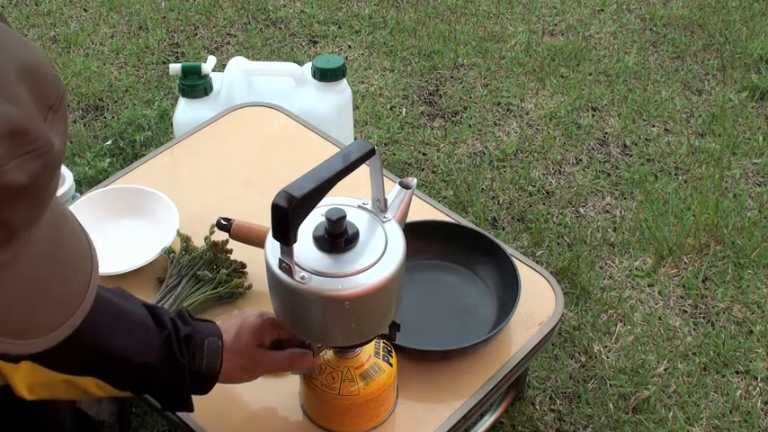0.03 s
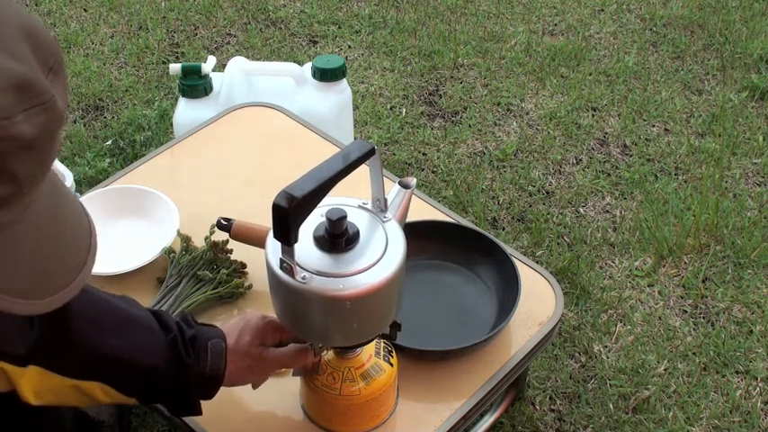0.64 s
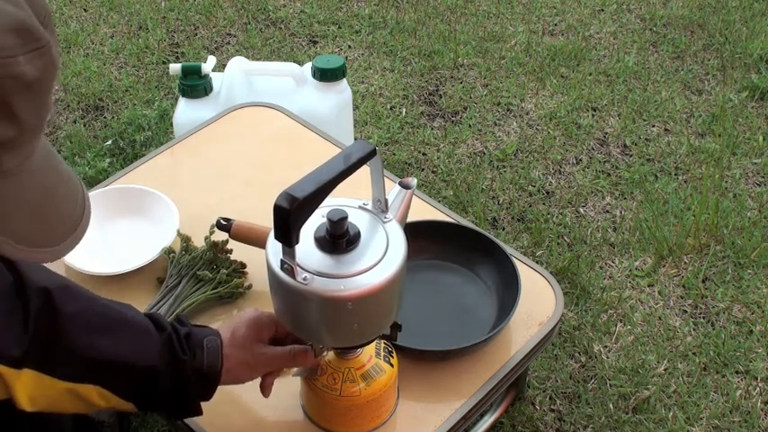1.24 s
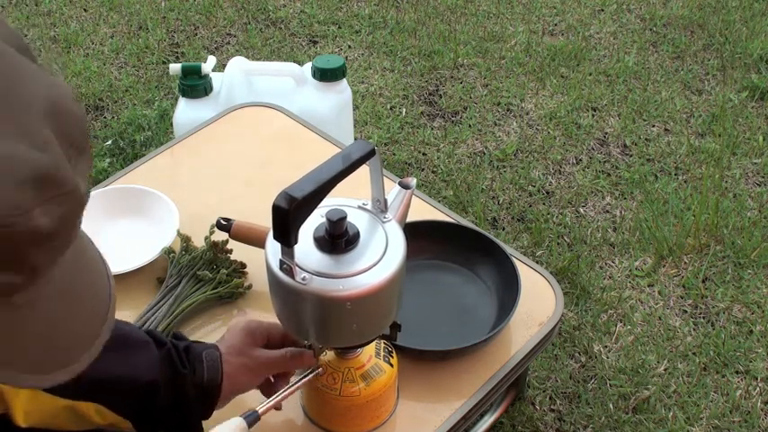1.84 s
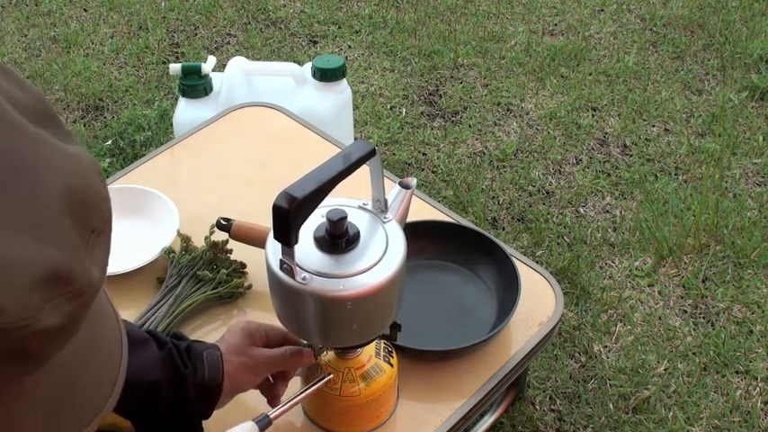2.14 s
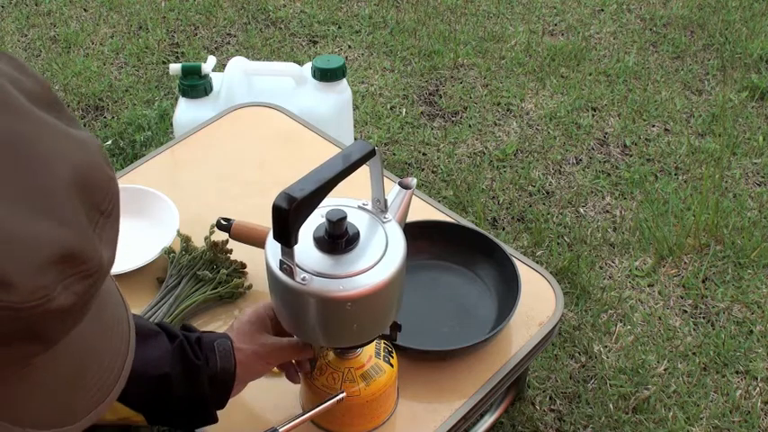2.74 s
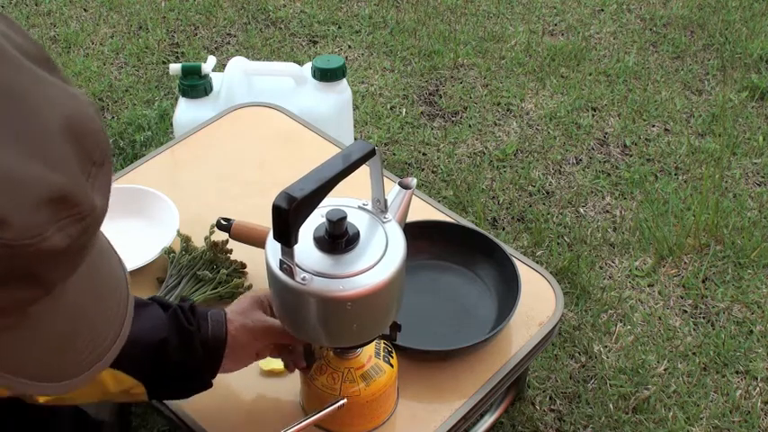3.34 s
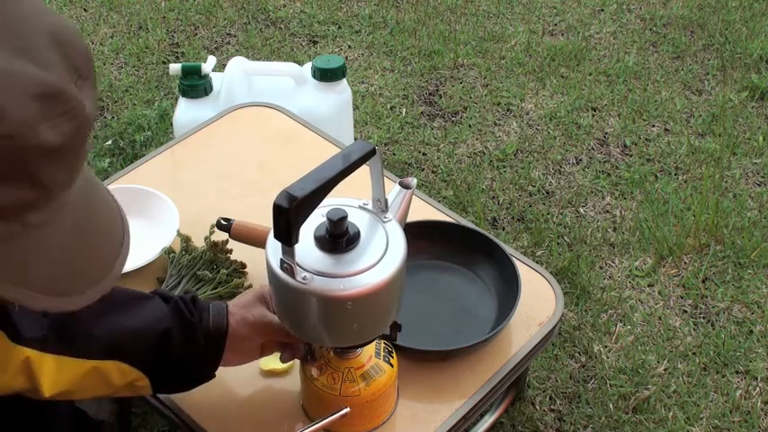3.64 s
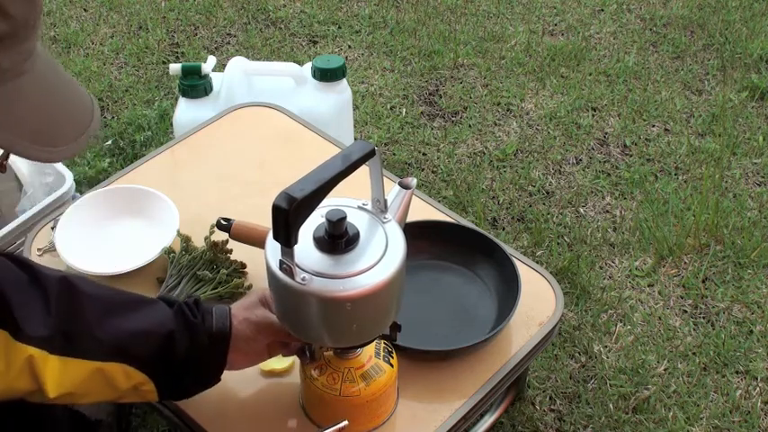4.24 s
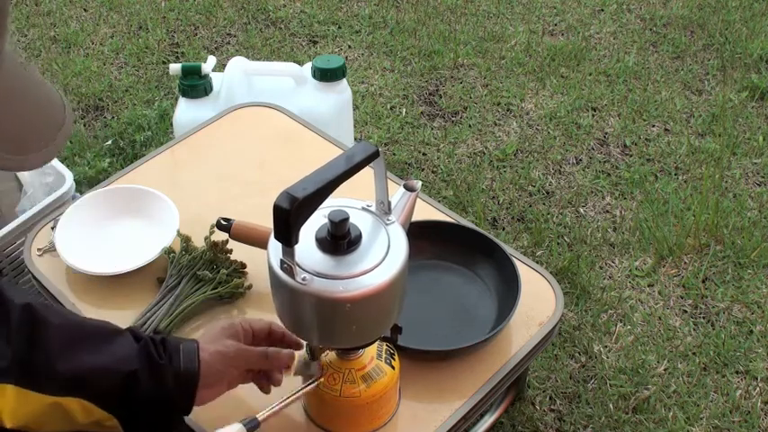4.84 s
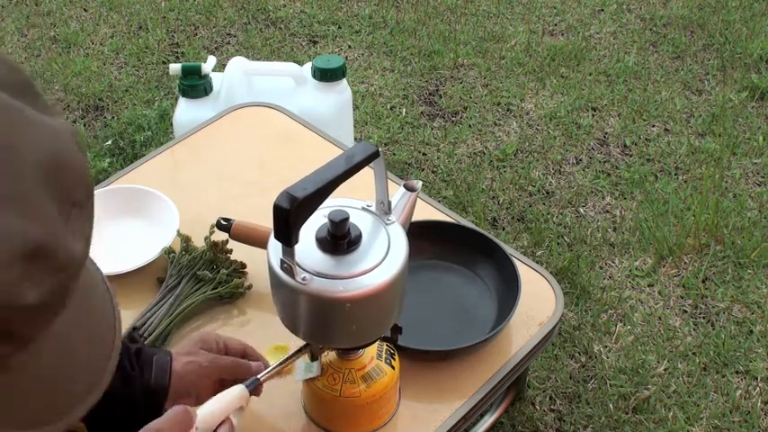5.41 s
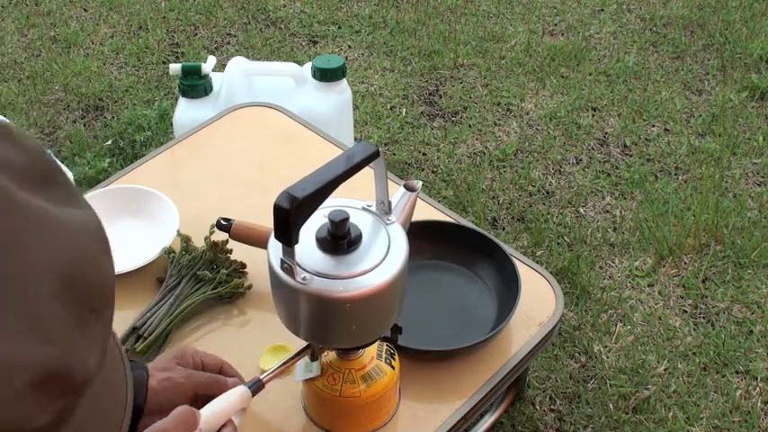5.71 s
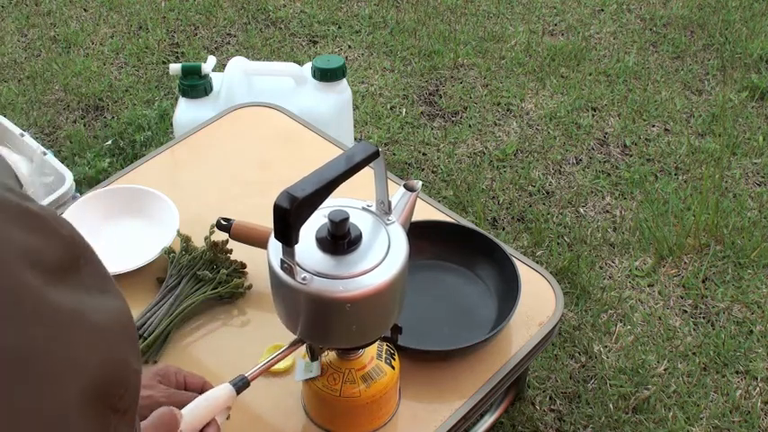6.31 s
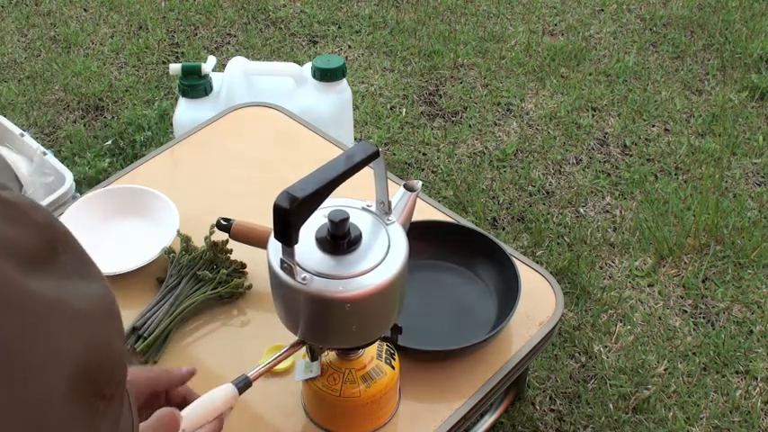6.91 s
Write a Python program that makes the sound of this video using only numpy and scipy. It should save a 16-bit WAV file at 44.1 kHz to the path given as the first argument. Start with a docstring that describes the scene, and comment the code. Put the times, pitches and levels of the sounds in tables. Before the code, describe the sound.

Gas hisses from a camp stove outdoors, with small metallic knocks from the kettle on top and one sharp lighter click.

```python
"""A camping gas stove with a kettle on it stands on a folding table on a lawn, in faint still air. From the
start a hand works the valve: the stove rocks and knocks, its foot scrapes the table, the thread ticks. Gas
starts at 0.7 s and opens fully at 1.3 s; the turbulent jet hisses through the ringing burner tube. At 4.4 s a
wand lighter snaps once, and the knocking soon thins out. From 5.3 s the wand taps about on the burner, whose
steady rush goes on."""
import sys
import numpy as np
from scipy import signal
from scipy.fft import rfft, irfft
from scipy.io import wavfile
from scipy.ndimage import uniform_filter1d

SR = 44100
rng = np.random.default_rng(int(sys.argv[2]) if len(sys.argv) > 2 else 0)


def generate_wav(signal):
    """Clip the signal to [-1, 1] and save it as 16-bit WAV at the path in sys.argv[1]."""
    frames = np.transpose(np.atleast_2d(signal))
    scaled = np.clip(frames, -1, 1) * 32767
    pcm = np.round(scaled).astype(np.int16)
    wavfile.write(sys.argv[1], SR, pcm)


N = 315756

# left-right coherence, nearly centred, fully mono above 12.5 kHz: f/Hz, coherence/0-1
COHERENCE = [(30, .75), (70, 0.7), (150, 1), (300, 0.98), (700, 0.8), (1400, 0.81), (2800, 0.96),
             (5200, 0.97), (7500, 1), (9500, 0.85), (11500, 0.88), (12500, 1)]


def gain_of(db):
    """Decibels to amplitude."""
    return 10 ** (np.asarray(db) / 20)


def unit_rms(x):
    """Scales to rms 1."""
    return x / np.sqrt(np.mean(x ** 2) + 1e-20)


def unit_hit(x):
    """Scales a hit to rms 1 over its first 30 ms."""
    return x / np.sqrt(np.mean(x[..., :round(.03 * SR)] ** 2))


def at_hz(table, hz):
    """Interpolates a spectrum table over log frequency."""
    table_hz, value = np.transpose(table)
    return np.interp(np.log(hz + 1), np.log(table_hz + 1), value)


def add(mix, start_s, sound):
    """Mixes a sound in at start_s."""
    part = mix[:, round(start_s * SR):][:, :sound.shape[1]]
    part += sound[:, :part.shape[1]]


def stereo(mid, side, hz, coherence=COHERENCE):
    """Left and right spectra from a shared and an unshared part."""
    same = np.clip(at_hz(coherence, hz), 0, 1)
    mid, side = mid * np.sqrt((1 + same) / 2), side * np.sqrt((1 - same) / 2)
    return np.array([mid + side, mid - side])


def noise(colour, size, coherence=COHERENCE):
    """Stereo noise of rms 1 with the given spectrum."""
    hz = np.fft.rfftfreq(size, 1 / SR)
    white = stereo(*rfft(rng.standard_normal((2, size))), hz, coherence)
    return unit_rms(irfft(white * gain_of(at_hz(colour, hz)), size))


def wander(t, slow_hz, fast_hz):
    """Slow random motion of rms 1."""
    rates_hz = np.geomspace(slow_hz, fast_hz, 30)
    return unit_rms(sum(np.sin(2 * np.pi * (hz * t + rng.random())) / hz ** 0.06 for hz in rates_hz))


def decay(t, rise_s, t60_s, tail_db, tail_t60_s):
    """Envelope: quick rise, main decay, weaker and longer tail."""
    tail = gain_of(tail_db - 60 * t / tail_t60_s)
    return (1 - np.exp(-t / rise_s)) * np.hypot(gain_of(-60 * t / t60_s), tail)


def modes(t, table, rise_s, low_hz=0, high_hz=SR):
    """An object's damped modes in one band; strength and phase vary per strike."""
    hz, db, t60_s = np.transpose(table)[:, :, None]
    spread_db, phase = 2 * rng.standard_normal(hz.shape), rng.random(hz.shape)
    rings = gain_of(db + spread_db - 60 * t / t60_s) * np.sin(2 * np.pi * (hz * t + phase))
    in_band = (hz > low_hz) * (hz < high_hz)
    return unit_hit((rings * in_band).sum(0) * (1 - np.exp(-t / rise_s)))


def low_cut(x, cutoff_hz=150):
    """High-pass at 150 Hz keeps deep rumble out of the knocks, slips and rubs."""
    return signal.sosfilt(signal.butter(2, cutoff_hz, "highpass", fs=SR, output="sos"), x)


def air(level_db=-57.5):
    """Still air over the lawn; distant sound reaches left and right almost unrelated."""
    # air spectrum: f/Hz, density/dB
    colour = [(20, -12), (60, -8), (130, -3), (250, 2.5), (500, 4), (1000, 3.5), (2000, 1), (4000, -5),
              (8000, -10), (13000, -13.5), (16000, -16)]
    # left-right coherence: f/Hz, coherence/0-1
    coherence = [(30, 0.39), (200, 0.2), (400, 0.037), (5000, 0.046), (12000, 0.98)]
    return gain_of(level_db) * noise(colour, N, coherence)


def foot_scrapes(spread_hz=65):
    """Short rough groans as the stove's foot scrapes the table."""
    # rubs: peak t/s, f/Hz, level/dB, Gaussian sigma/s
    rubs = [(.657, 345, -49, .008), (0.819, 325, -41.5, .007), (2.643, 360, -49.5, 0.0075),
            (2.796, 422, -49, 0.0086), (4.591, 390, -54, .018), (4.686, 380, -51, .008)]
    out = np.zeros((2, N))
    for peak_s, centre_hz, db, sigma_s in rubs:
        t = np.arange(-3 * sigma_s, 3 * sigma_s, 1 / SR)
        cluster_hz = centre_hz + spread_hz * np.linspace(-1, 1, 5)
        beating = sum(np.cos(2 * np.pi * (hz * t + rng.random())) for hz in cluster_hz)
        swell = np.exp(-.5 * (t / sigma_s) ** 2)
        groan = unit_rms(beating * swell) * np.sqrt(np.mean(swell ** 2))
        add(out, peak_s + t[0], gain_of(db) * groan[None])
    return out


def contacts(events, colour, rise_s, t60_s):
    """Light metal contacts: a short dense ring each, brighter for a sharper touch."""
    t, out = np.arange(SR // 4) / SR, np.zeros((2, N))
    envelope = decay(t, rise_s, t60_s, tail_db=-16, tail_t60_s=.2)
    for start_s, db, tilt_db in events:
        tilted = [(hz, band_db + tilt_db * np.log(hz) / np.log(4)) for hz, band_db in colour]
        add(out, start_s, gain_of(db) * unit_hit(noise(tilted, len(t)) * envelope))
    return out


def valve_ticks():
    """The valve thread ticks thinly as it turns."""
    # ticks: t/s, level/dB, tilt/(dB per 2 octaves)
    ticks = [(.626, -60, -2), (1.0435, -43, -3), (2.662, -42, 4), (2.727, -46, 3), (3.348, -38.5, 0),
             (4.61, -43.5, -1)]
    # tick spectrum: f/Hz, density/dB
    colour = [(400, -50), (2000, -19), (6000, -12), (8800, 2), (10500, -14), (12500, 1), (14500, -11),
              (16500, -40)]
    return contacts(ticks, colour, rise_s=.002, t60_s=0.087)


def wand_taps():
    """The lighter's wand taps the burner."""
    # taps: t/s, level/dB, tilt/(dB per 2 octaves)
    taps = [(5.34, -41.5, 0), (5.425, -46.5, 0), (5.5505, -31.5, 2.5), (5.972, -40.5, -1), (5.995, -43, -2),
            (6.487, -46, 0), (6.8905, -34.5, -0.5), (6.955, -44, -2), (7.1, -48, 0)]
    # tap spectrum: f/Hz, density/dB
    colour = [(100, -30), (400, -18), (1000, -2.5), (1450, -3.5), (1700, -8), (2200, 6), (2900, -1),
              (3400, -5), (4100, -3), (6000, -2), (9500, -3), (13000, -16), (16000, -31.5)]
    return contacts(taps, colour, rise_s=0.0008, t60_s=0.13)


def knock_band(t, grain, band_hz, rise_s, t60_s, tonal_share):
    """One band of a knock: decaying noise for the dense modes, plus the clear ones."""
    # modes of stove, kettle and table: f/Hz, level/dB, t60/s
    stove_modes = [(203, -4.5, 0.19), (251, -2, 0.16), (320, -11, 0.046), (529.5, 0.5, 0.084),
                   (784, 0.5, 0.16), (1012, -4.5, 0.24), (2340, -16, 0.35), (2560, 2.5, 0.14),
                   (2663, -6.5, 0.39), (3340, -4.5, 0.15), (3590, -7, 0.13), (3950, -4.5, 0.12),
                   (4150, -4, 0.11), (4720, -3, 0.17), (5000, -8, 0.12), (5930, -3, 0.13), (6240, -7, .14),
                   (6850, 1.5, 0.11), (6850, 0, 0.12), (7440, -5, 0.15), (7520, -2, .12), (8160, -5, 0.16),
                   (8700, -4, 0.11), (9700, -2, 0.069), (11100, -1.5, 0.085), (11680, -15, 0.08),
                   (12750, -10, .09)]
    dense = unit_hit(grain * decay(t, rise_s, t60_s, tail_db=-5, tail_t60_s=0.23))
    clear = modes(t, stove_modes, rise_s, *band_hz)
    return unit_hit(np.sqrt(1 - tonal_share) * dense + np.sqrt(tonal_share) * clear)


def table_thud(t, mean_hz=237.7, delay_s=0.01287, sigma_s=0.0051, shiver_db=-3.5):
    """The table top gives for a few low cycles under a knock, then shivers."""
    # shiver spectrum: f/Hz, density/dB
    colour = [(40, -25), (140, -10), (200, 0), (250, 8), (330, -4.5), (420, -13), (600, -38), (1500, -70)]
    detune, lag, phase = rng.uniform(-0.87, 1, 3)
    from_peak_s = t - delay_s * (1 + 0.2 * lag)
    cycles = np.cos(2 * np.pi * mean_hz * (1 + .15 * detune) * from_peak_s + np.pi * phase)
    bump = np.exp(-.5 * (from_peak_s / sigma_s) ** 2) * cycles * np.minimum(t / .003, 1)
    shiver = knock_band(t, noise(colour, len(t)), (100, 450), 0.0022, t60_s=0.078, tonal_share=0.22)
    return unit_hit(unit_hit(bump) + gain_of(shiver_db) * shiver)


def stove_knocks(thud_db=-3.5, ring_db=4.5):
    """Stove and kettle rock: pot and metal ring at once, the table swells a few ms later."""
    # knocks: t/s, strength/dB, hardness/dB (more ring, less thud)
    knocks = [(.152, -62, -1.5), (.178, -70, -2), (0.308, -48, 2), (0.42, -60.5, -2.5), (0.5483, -52, 1),
              (0.6245, -51.5, -7), (.668, -42, 2.5), (0.7604, -45.5, -4), (.809, -43.5, -0.5),
              (0.8979, -43, 1.5), (.948, -45, 1), (1.0888, -45.5, 2.5), (1.3351, -44.5, 0),
              (1.4697, -47.5, 0.5), (1.6643, -49.5, -1), (1.8924, -49.5, -2), (2.014, -46.5, 0.5),
              (2.449, -54, -1), (2.636, -54, -2), (2.685, -45.5, -0.5), (2.735, -58, 0), (2.785, -52.5, 5),
              (2.916, -42, 1.5), (3.029, -51, 3), (3.16, -47.5, 0), (3.245, -54, 2), (3.3325, -47.5, 1),
              (3.385, -46.5, 1.5), (3.485, -49.5, 1), (3.585, -50, 0), (3.713, -45, 2), (3.833, -51.5, -1),
              (3.881, -53.5, 1), (3.9462, -47, 1), (4.0633, -48.5, .5), (4.162, -56, -1),
              (4.297, -54.5, -2), (4.385, -51, -1), (4.5623, -49, -2), (4.6707, -47.5, -1),
              (4.728, -53.5, 4), (4.8013, -48, -1.5), (4.849, -57.5, 0), (6.487, -56, -1),
              (6.8914, -50.5, -6), (6.945, -60, -2)]
    # pot spectrum: f/Hz, density/dB
    pot_colour = [(200, -48), (400, -4), (520, 0), (660, -2), (800, -3), (1000, -1.5), (1250, -6.5),
                  (1600, -12), (2400, -13), (5000, -60)]
    # spectrum of the metal parts: f/Hz, density/dB
    metal_colour = [(700, -50), (1600, -17), (2200, -5), (2600, 4.5), (3200, -7), (5000, -3), (7000, -2),
                    (8400, -12), (9500, -5), (10400, -11), (11500, -5.5), (13000, -13), (15000, -29)]
    t, out = np.arange(SR // 3) / SR, np.zeros((2, N))
    shared_grain = noise(metal_colour, len(t))  # the same parts ring each time
    for start_s, strength_db, hard_db in knocks:
        thud = table_thud(t)
        pot = noise(pot_colour, len(t))
        clank = knock_band(t, pot, (450, 1600), rise_s=0.00057, t60_s=0.13, tonal_share=0.43)
        metal = shared_grain + 0.6 * noise(metal_colour, len(t))
        ring = knock_band(t, metal, (1600, 16000), rise_s=.0005, t60_s=.1, tonal_share=.66)
        knock = gain_of(thud_db - hard_db) * thud + clank + gain_of(ring_db + hard_db) * ring
        add(out, start_s, gain_of(strength_db) * knock)
    return out


def kettle_slips():
    """The kettle slips on its supports and rings."""
    # slips: t/s, level/dB
    slips = [(0.761, -38.5), (0.898, -40.5)]
    # modes of the water-filled kettle: f/Hz, level/dB, t60/s
    kettle_modes = [(507, -6.5, 0.11), (650, -9, 0.082), (790, -7, 0.1), (918, 0.5, 0.11),
                    (1067, -5, 0.087), (1300, -5, 0.065), (1497, -9, 0.09), (2070, -14, 0.11),
                    (2500, -12, 0.17), (2770, -18, 0.087), (3400, -8, 0.072)]
    t, out = np.arange(SR // 3) / SR, np.zeros((2, N))
    for start_s, db in slips:
        add(out, start_s, gain_of(db) * modes(t, kettle_modes, rise_s=0.00074)[None])
    return out


def lighter_snap(crack_s=0.00082, echo_s=.0036, wand_db=-9):
    """The spring hammer cracks and rings the wand; the table reflects the crack."""
    # trigger, then hammer: t/s, level/dB, relative crack/dB
    snaps = [(4.3655, -31, -8), (4.387, -20, 4)]
    # snap spectrum: f/Hz, density/dB
    colour = [(60, -45), (200, -20), (800, -21), (1100, -17), (1500, -15), (2200, -6), (2800, -8),
              (3400, -4), (4100, -5), (5500, 0.5), (7500, 0.5), (10000, -0.5), (12500, -2), (14000, -10),
              (16500, -12)]
    # modes of the metal wand: f/Hz, level/dB, t60/s
    wand_modes = [(1130, -15, .1), (2090, -11, 0.2), (3340, -1, 0.046), (5220, -8, 0.089), (5500, -3, .1),
                  (6730, -8, 0.45), (7639, -8, .07), (8580, -1.5, 0.092), (11800, -14, .04)]
    t, out = np.arange(SR // 4) / SR, np.zeros((2, N))
    scatter = decay(t, rise_s=.00025, t60_s=.085, tail_db=-20, tail_t60_s=.22)
    echo = decay(np.maximum(t - echo_s, 0), rise_s=.0003, t60_s=.03, tail_db=-20, tail_t60_s=.1)
    for start_s, db, crack_db in snaps:
        envelope = np.hypot(scatter, echo) + gain_of(crack_db) * np.exp(-t / crack_s)
        crack = unit_hit(noise(colour, len(t)) * envelope)
        wand = gain_of(wand_db) * modes(t, wand_modes, rise_s=0.00055)
        add(out, start_s, gain_of(db) * unit_hit(crack + wand))
    return out


def echo_comb(t, hz, echoes=12, creep_s=.00005):
    """Spectral ripple from echoes off table, kettle and arm; it creeps as the arm moves."""
    delays_s = [rng.uniform(.002, .014) + creep_s * wander(t, .05, .4) for _ in range(echoes)]
    return unit_rms(sum(np.cos(2 * np.pi * delay_s[:, None] * hz) for delay_s in delays_s))


def valve_flow(t):
    """Jet amplitude: each turn of the valve settles at a new flow; spurts ride on top."""
    # valve turns: t/s, flow reached/dB, time constant/s
    turns = [(.67, -52, 0.0092), (1.285, -41, 0.002), (1.33, -34.5, 0.082)]
    # gas spurts: peak t/s, level/dB, Gaussian sigma/s
    spurts = [(0.74, -51.5, 0.057), (1.202, -48.5, 0.017), (2.791, -30, 0.0084)]
    steady, previous = np.zeros(len(t)), 0
    for start_s, db, settle_s in turns:
        steady += (gain_of(db) - previous) * (1 - np.exp(-np.maximum(t - start_s, 0) / settle_s))
        previous = gain_of(db)
    puffs = sum(gain_of(db) * np.exp(-.5 * ((t - peak_s) / sigma_s) ** 2) for peak_s, db, sigma_s in spurts)
    return np.hypot(steady, puffs)


def burner_power(t, hz, sway_db=.5, waver=.0025):
    """Power per frame and bin: broad jet rush plus burner resonances, shaded and detuned by the hand."""
    # jet spectrum between the resonances: f/Hz, level/dB
    rush = [(30, -50), (120, -42.5), (190, -35), (290, -28.5), (400, -21.5), (600, -23), (1100, -25.5),
            (1400, -22), (1700, -24), (3300, -24.5), (5000, -14.5), (6500, -20.5), (8000, -19),
            (10200, -20.5), (12000, -20), (13500, -26), (15000, -57)]
    # tube and head resonances: f/Hz, width/Hz, level/dB at hand places 0, 1, 2
    resonances = [(2022, 97, -10.5, -10.5, -13), (2302, 65, -17.5, -9.5, -22), (2710, 104, -15, -12, -5.5),
                  (2890, 90, -9, -12, -16.5), (3595, 48, -14.5, -14.5, -21), (3930, 140, -19.5, -19.5, -16),
                  (4090, 55, -25, -14, -7), (4197, 58, -10, -6, -9), (4410, 180, -10, -11, -9.5),
                  (4803, 81, -5.5, -1.5, -2), (5087, 79, -6, -5.5, 1.5), (5180, 85, 0.3, -1, -4),
                  (5434, 90, -5.5, -2.5, -1), (5630, 50, -3.5, -5, -3.5), (5842, 61, -6, -5.5, -3),
                  (6060, 200, -15, -12.5, -14.5), (6350, 50, -15, -16, -17), (6680, 85, -12.5, -11.5, -14),
                  (7075, 81, -3.5, -5.5, -4), (7306, 80, -6, -3.5, -4.5), (7640, 74, -5.5, -3, -6),
                  (7980, 76, -11.5, -8, -11), (8300, 83, -13, -10.5, -14), (8620, 88, -12, -8, -8.5),
                  (8880, 70, -22, -15, -15), (9110, 80, -15, -10, -20), (9390, 94, -14.5, -13.5, -16),
                  (10900, 220, -15.5, -17.5, -18), (11740, 320, -14, -15, -15.5)]
    # hand path: t/s, place (0 beside the valve, 1 cupped round it, 2 away), detuning/%
    hand = [(2.6, 0.23, 0.24), (2.95, 0.94, 0.12), (4.5, 1.4, -0.082), (4.95, 1.3, -0.27)]
    hand_s, places, detune_pct = np.transpose(hand)
    place = np.interp(t, hand_s, places)
    tuning = 1 + np.interp(t, hand_s, detune_pct)[:, None] / 100
    tuning = tuning + waver * wander(t, 0.403, 3)[:, None]  # unsteady flow
    power = np.tile(gain_of(at_hz(rush, hz)) ** 2, (len(t), 1))
    for centre_hz, width_hz, *place_db in resonances:
        mixing_db = sway_db * wander(t, 0.322, 4.6)  # gas mixes with air
        height = gain_of(np.interp(place, [0, 1, 2], place_db) + mixing_db)
        power += (height[:, None] / (1 + ((hz - centre_hz * tuning) / width_hz) ** 2)) ** 2
    return power


def gas_hiss(gain_db=2.5, flutter_db=0.31, patch_db=0.9, comb_db=1.68):
    """Turbulent jet noise rings the burner; the flow sets its level."""
    # slow drift of the hiss: t/s, level/dB, treble/dB
    drift = [(.9, -2, 2), (1.3, 0, 0), (2.15, 0.5, 0.5), (2.48, 2, 1), (2.68, 0.2, 2.5), (3.2, 0.5, 0),
             (3.45, 1.5, -0.5), (3.72, 1.2, -0.5), (3.92, 2, 1), (4.2, 1.5, -.7), (4.55, 1.9, -1),
             (4.85, -0.8, 1.5), (5.2, .6, -1), (5.9, -0.24, -1), (6.6, -0.26, 0.3), (7.1, 0.8, -1)]
    # drift of the two lowest resonances: t/s, level/dB
    low_drift = [(1.4, 0.5), (2.2, 1.5), (3.1, 1), (3.7, -4), (4.6, -2.5), (5.2, 1), (7, 1)]
    drift_s, drift_db, treble_db = np.transpose(drift)
    frame_s, hz = np.arange(N // 512 + 6) * 512 / SR, np.fft.rfftfreq(2048, 1 / SR)
    power = burner_power(frame_s, hz)
    mid_re, mid_im, side_re, side_im, patches = rng.standard_normal((5, len(frame_s), len(hz)))
    white = stereo(mid_re + 1j * mid_im, side_re + 1j * side_im, hz)
    patches = unit_rms(uniform_filter1d(uniform_filter1d(patches, size=4, axis=0), size=48, axis=1))
    treble_band = np.interp(hz, [5600, 7200], [0, 1])
    low_band = np.interp(hz, [1620, 1890, 2300, 2960], [0, 1, 1, 0])
    colour_db = patch_db * patches + comb_db * echo_comb(frame_s, hz)
    colour_db += np.interp(frame_s, drift_s, treble_db)[:, None] * treble_band
    colour_db += np.interp(frame_s, *np.transpose(low_drift))[:, None] * low_band
    spectra = white * np.sqrt(power) * gain_of(colour_db)
    jet = unit_rms(signal.istft(spectra.swapaxes(-1, -2), nperseg=2048, noverlap=1536)[1][:, :N])
    t = np.arange(N) / SR
    flutter = np.interp(t, frame_s, wander(frame_s, 4, 35))
    return jet * valve_flow(t) * gain_of(gain_db + np.interp(t, drift_s, drift_db) + flutter_db * flutter)


def scene():
    """Everything sits near the middle, in open air."""
    rocking = low_cut(stove_knocks() + kettle_slips() + foot_scrapes())
    handling = rocking + wand_taps() + valve_ticks()
    balance_db = [[.12], [-.12]]
    return (gas_hiss() + handling + lighter_snap()) * gain_of(balance_db) + air()


def record(dry):
    """Steep low-pass at 15.9 kHz."""
    return signal.oaconvolve(dry, signal.firwin(511, 15900, window=("kaiser", 9), fs=SR)[None], "same")


dry = scene()
out = record(dry)
generate_wav(out)
```